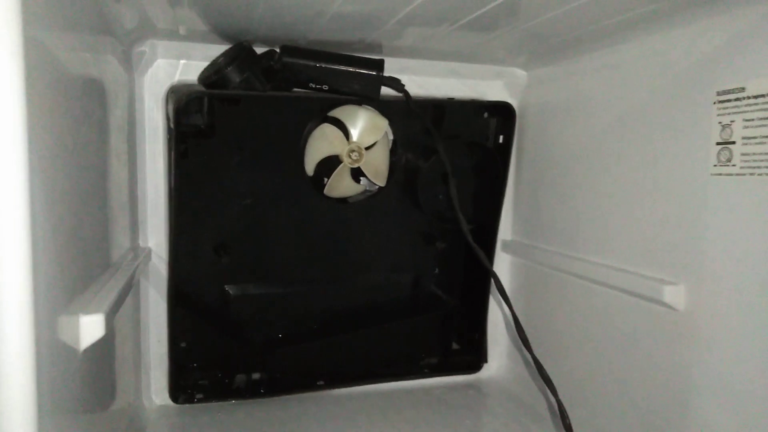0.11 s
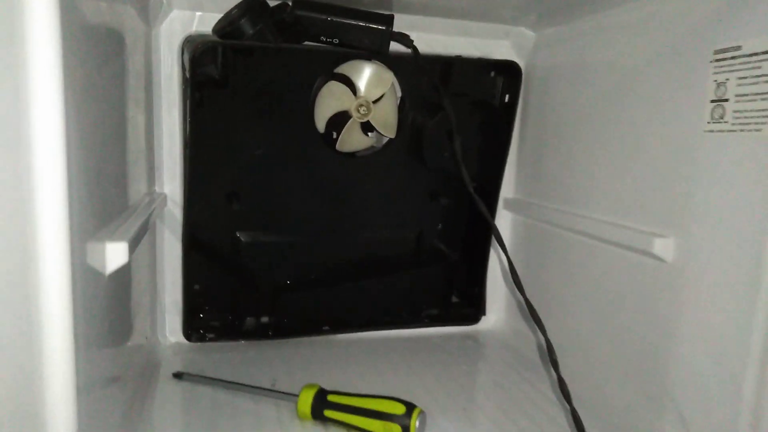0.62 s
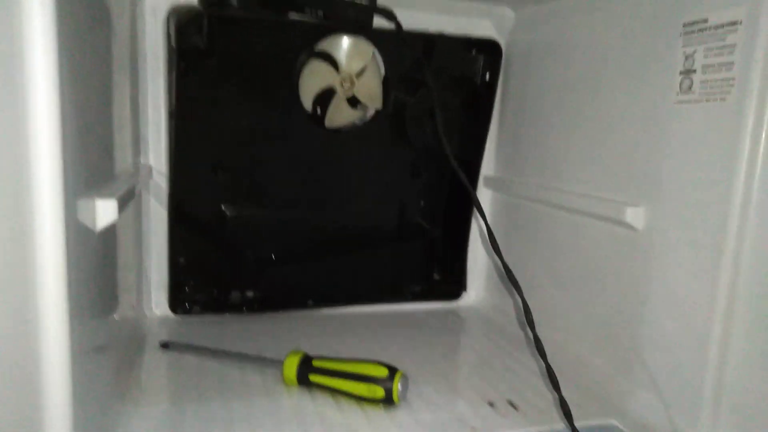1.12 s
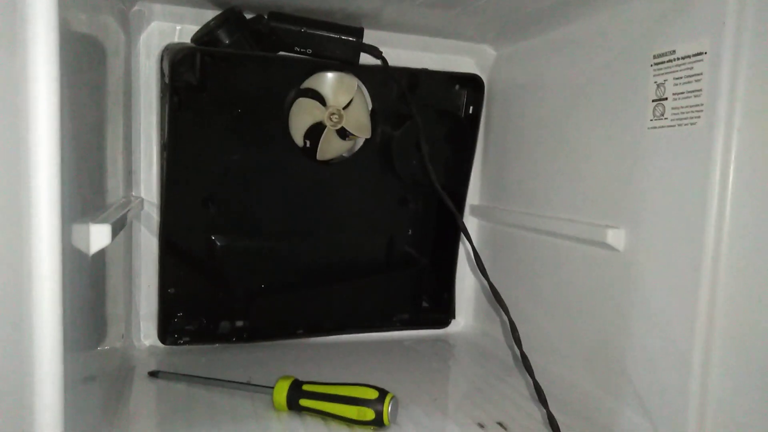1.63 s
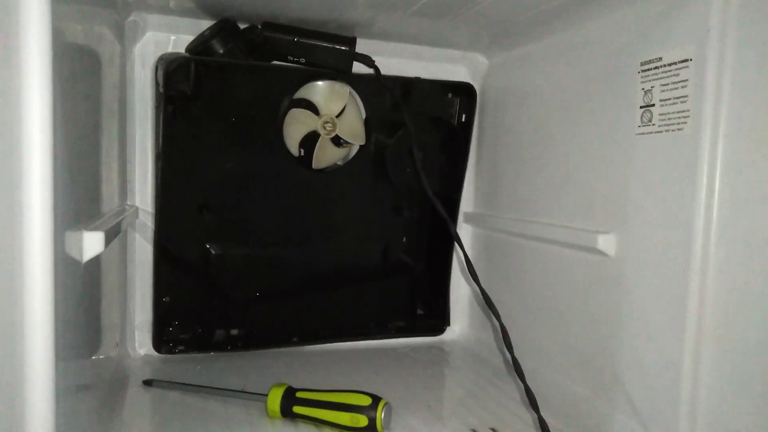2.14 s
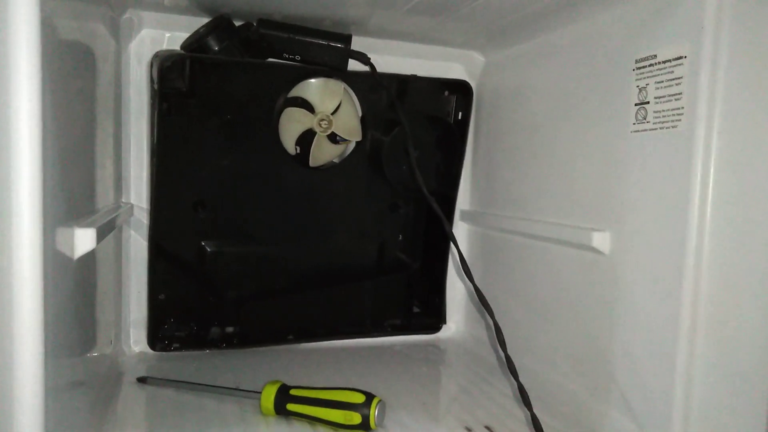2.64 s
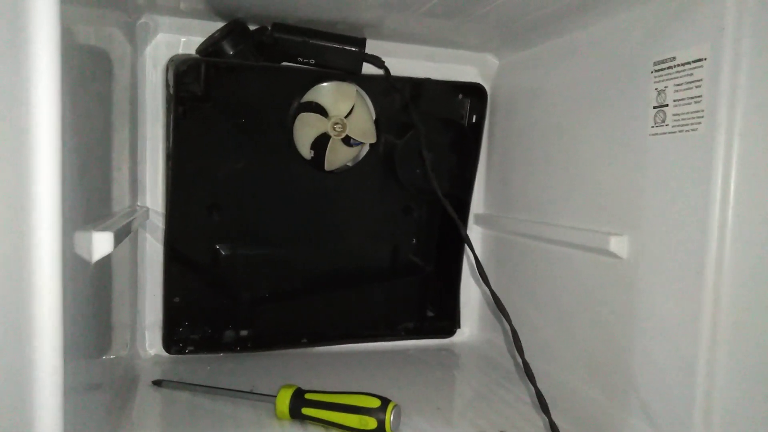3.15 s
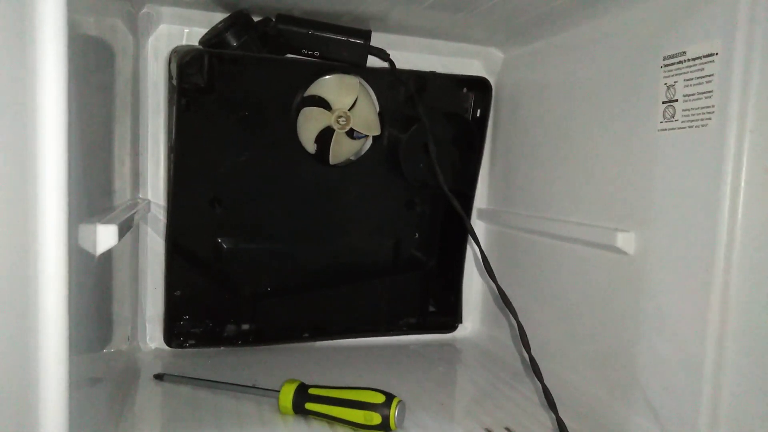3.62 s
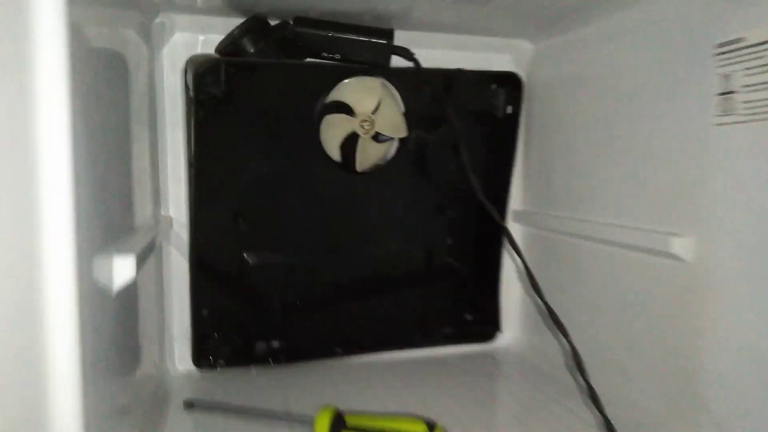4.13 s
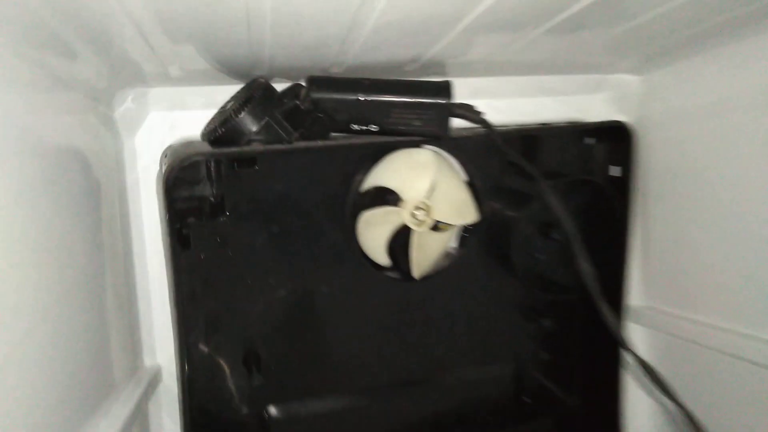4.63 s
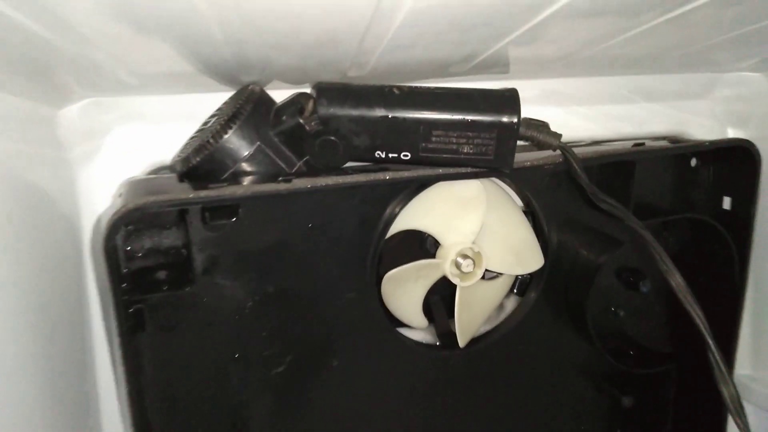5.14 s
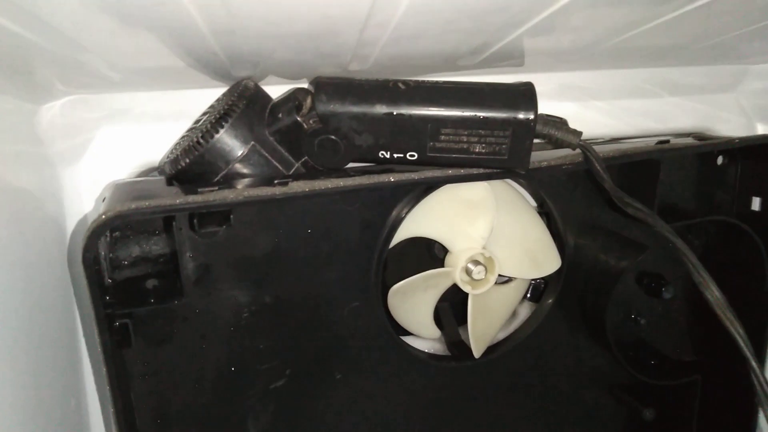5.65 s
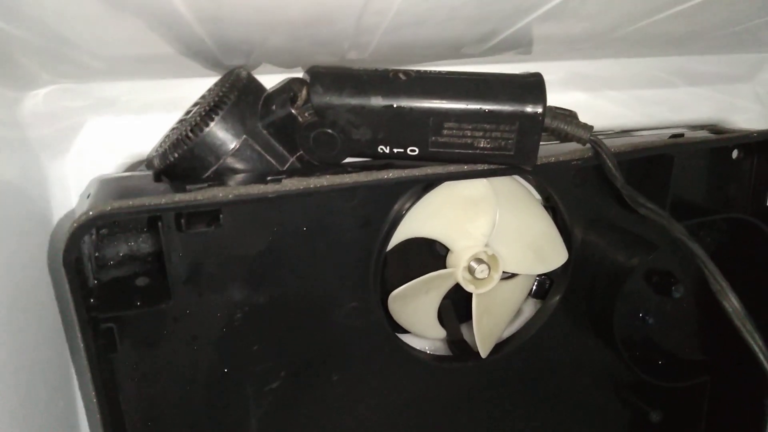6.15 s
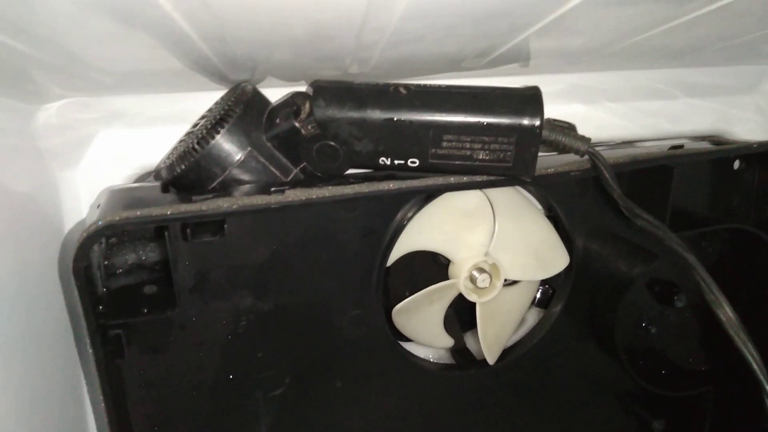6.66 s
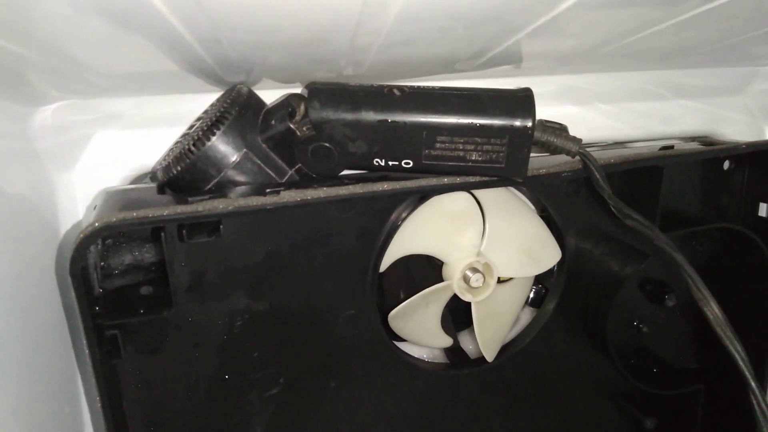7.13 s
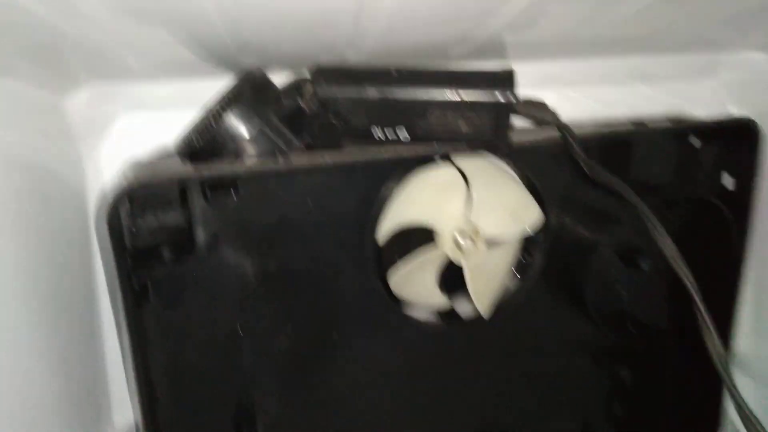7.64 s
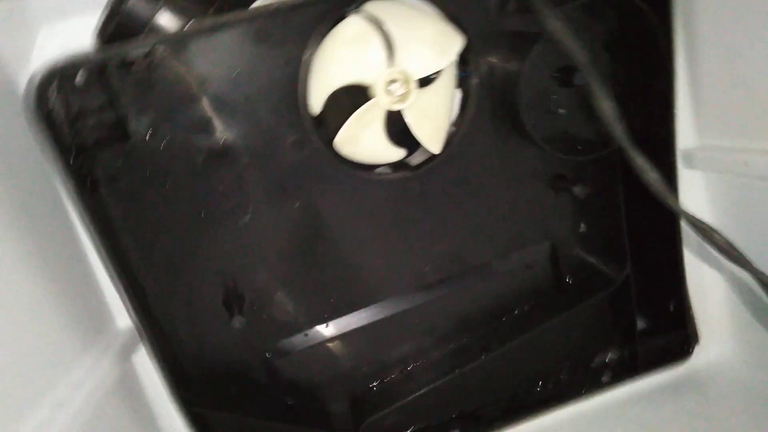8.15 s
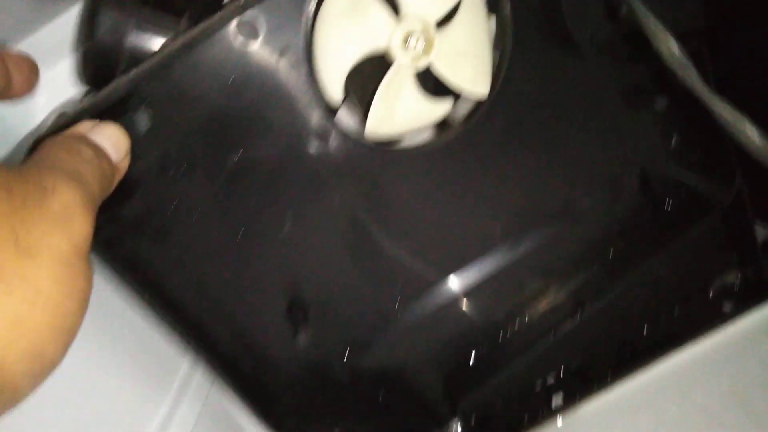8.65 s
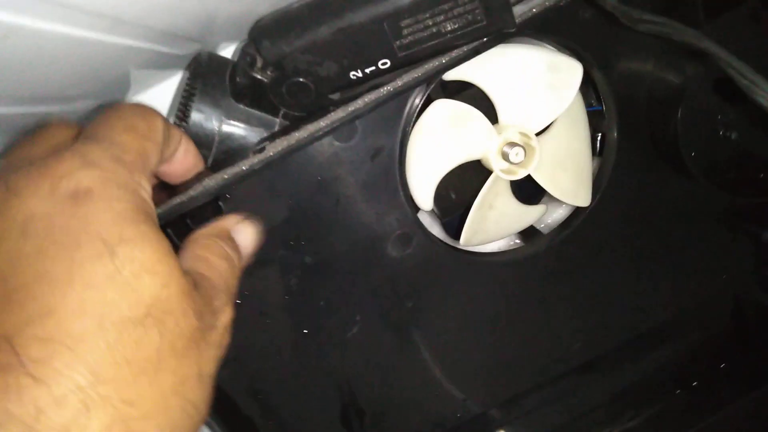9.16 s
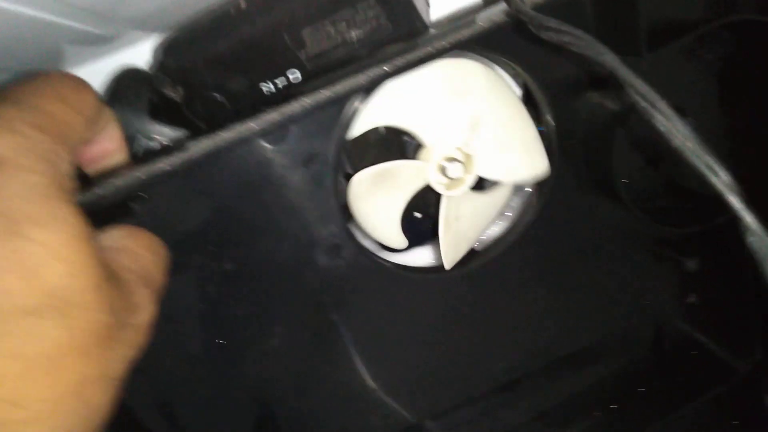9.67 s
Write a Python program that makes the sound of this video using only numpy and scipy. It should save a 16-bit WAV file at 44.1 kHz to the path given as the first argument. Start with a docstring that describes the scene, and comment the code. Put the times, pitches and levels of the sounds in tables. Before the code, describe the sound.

Continuous loud rush of blown air and whining small motor in a hollow plastic compartment, its tone shifting as the microphone moves closer and aside.

```python
"""A steady hiss, roar and whine: a hair dryer runs inside an empty plastic freezer box, heard by a moving microphone.
Roar and jet hiss are noise filtered by a response for each place; the whine is sines on the fan shaft's orders.
The hand-held mono microphone looks in from outside, moves in close, then swings aside out of the jet's treble.
Each place hears its own pattern of the box's standing waves; the input is loud enough to clip."""
import sys
import numpy as np
from scipy import signal
from scipy.fft import rfft, irfft
from scipy.io import wavfile
from scipy.ndimage import uniform_filter1d, map_coordinates

SR = 44100
rng = np.random.default_rng(int(sys.argv[2]) if len(sys.argv) > 2 else 0)


def dump_mix(stems):
    """Bounce the given channels to the path in sys.argv[1] as a 16-bit WAV at rate SR."""
    frames = np.atleast_2d(stems).T  # one column per channel
    limited = np.clip(frames, -1, 1)  # hard clip at full scale
    pcm = np.round(limited * 32767).astype(np.int16)
    wavfile.write(sys.argv[1], SR, pcm)


def invert_db(level):
    """Linear amplitude ratio for a level in decibels (20 dB per decade), elementwise."""
    return 10 ** (np.asarray(level, dtype=float) / 20)


N = 431298  # samples

# the hand's path: (t/s, place 0-6, between two numbers while moving)
HAND_PATH = [(0, 0), (.4, 0), (.8, .6), (1.6, 1), (4.05, 1), (4.45, 2), (4.68, 2), (4.85, 3), (7.74, 3),
             (7.85, 4), (8.2, 4), (8.5, 5), (8.75, 5), (9.05, 6), (9.78, 6)]


def unit(x):
    """Scaled to rms 1."""
    return x / np.sqrt(np.mean(x ** 2))


def along(points, hz):
    """(f/Hz, value) points read on a log frequency axis."""
    f, v = np.transpose(points)
    return np.interp(np.log(hz + 1), np.log(f + 1), v)


def curve(rows, s):
    """A table of (t/s, value) read at the times s."""
    return np.interp(s, *np.transpose(rows))


def at_place(values, s):
    """Values given for each place (last axis), blended along the hand's path."""
    place = curve(HAND_PATH, s)
    places = np.arange(values.shape[-1])[:, None]
    share = np.clip(1 - np.abs(place - places), 0, 1)
    return values @ share


def wobble(rate):
    """A smooth random curve, rate knots a second."""
    knots = rng.standard_normal(N // 100)
    return map_coordinates(knots, [np.arange(N) * rate / SR])


def smooth_noise(shape, bins, frames):
    """Random gains at rms 1, smoothed over frequency bins and time frames."""
    rough = rng.standard_normal(shape)
    across = uniform_filter1d(rough, size=bins, axis=0)
    return unit(uniform_filter1d(across, size=frames, axis=1))


def air(patchy_db=0.5, comb_db=1.57, split_hz=3000, drift_db=0.1):
    """Turbulent noise of fan and jet, coloured by the box at each place, with faint eddies of gain."""
    # fan roar through the box's standing waves, one table a place: (f/Hz, level/dB per Hz)
    roar_places = [
        [(43, -70), (269, -59.5), (495, -63.5), (645, -70), (775, -62.5), (1012, -51), (1270, -50.5),
         (1539, -51), (1733, -56), (1841, -49), (1959, -55), (2293, -46.5), (2508, -45.5), (2993, -55.5)],
        [(43, -66.5), (279, -59.5), (570, -62), (732, -68), (860, -65), (1035, -48.5), (1130, -58.5),
         (1259, -46), (1496, -53.5), (1625, -46.5), (1735, -51.5), (1830, -48), (1948, -54.5), (2465, -48.5),
         (2993, -53.5)],
        [(43, -65.2), (161, -58), (290, -58), (495, -67), (699, -65), (904, -48), (1119, -55), (1335, -45),
         (1485, -52), (1604, -48), (1744, -51), (2444, -44), (2767, -57), (2993, -49)],
        [(43, -71), (139, -57.5), (279, -59), (419, -71), (559, -57), (710, -63), (1238, -49), (1561, -57.5),
         (1711, -50.5), (1905, -53), (2121, -42), (2260, -46), (2637, -46), (2993, -54.5)],
        [(43, -62.1), (172, -56), (419, -64.5), (710, -62), (893, -52), (1087, -61), (1324, -42.5), (1507, -58),
         (1690, -53.6), (2239, -46.5), (2390, -51), (2648, -44.5), (2885, -53), (2993, -50)],
        [(43, -61.6), (161, -55.5), (430, -64.5), (624, -57), (742, -67), (947, -49), (1130, -57.5),
         (1302, -50), (1561, -61), (1744, -51.5), (1927, -46), (2293, -43.5), (2487, -48), (2993, -53)],
        [(43, -63.1), (247, -55.5), (430, -68), (581, -60.5), (721, -66), (904, -53.5), (1141, -58.5),
         (1302, -53.5), (1475, -58), (2013, -45), (2293, -51.5), (2497, -45), (2767, -50.3), (2993, -50.5)],
    ]
    # jet hiss from the nozzle, one table a place: (f/Hz, level/dB per Hz)
    hiss_places = [
        [(3100, -52), (3466, -56), (4037, -50.5), (4758, -61.5), (5437, -52.5), (7310, -50), (7924, -46.3),
         (9097, -46.5), (9851, -50), (11487, -61), (14761, -60.8), (15590, -64)],
        [(3100, -52.5), (3456, -57.5), (4026, -51), (4748, -61), (5200, -54), (6126, -54), (6621, -50.5),
         (7741, -47), (9194, -46), (12112, -63.5), (14287, -61.5), (15590, -66)],
        [(3100, -56), (3348, -56.5), (4005, -50.5), (4737, -57.6), (5900, -50), (7827, -46.5), (8322, -46.5),
         (9571, -47.5), (11638, -63), (13382, -62.8), (14319, -59.8), (15590, -57)],
        [(3100, -51), (3413, -53), (4091, -45.5), (4285, -49.5), (4608, -56.5), (4801, -56.5), (6632, -47.5),
         (7784, -45.5), (8624, -48), (9377, -46), (11552, -62.5), (15590, -60.1)],
        [(3100, -48.5), (3531, -52), (4080, -45), (4823, -53.5), (5490, -50.5), (6072, -53.4), (7622, -51.5),
         (8860, -54.5), (10841, -56.5), (12532, -66), (13016, -69), (15590, -61)],
        [(3100, -50.5), (4080, -46.5), (4715, -55.5), (5221, -50), (6836, -51), (7601, -48.5), (9194, -56),
         (9948, -55.5), (11315, -61.5), (12489, -68), (13232, -69), (15590, -63)],
        [(3100, -50.5), (4145, -45.5), (4823, -54.5), (5480, -49), (6589, -51.5), (8021, -48), (9194, -55.5),
         (9905, -55), (10562, -58), (12887, -71), (14351, -71), (15590, -65.3)],
    ]
    # lowest air mode of the box and the thin bass under it: (f/Hz, gain/dB)
    boom = [(25, -7), (60, -5), (105, -13), (118, -3), (129, 13), (142, -1.5), (165, -0.5), (210, -3),
            (300, 0)]
    # the roar dips and swells as the microphone changes place: (t/s, gain/dB)
    roar_level = [(0, 0), (.5, 0), (4, -0.5), (4.5, -1.5), (5, -0.5), (7.5, -0.5), (7.8, -2), (8, 3),
                  (8.5, 0.5), (9, 1), (9.78, 1)]

    hz, s, z = signal.stft(rng.standard_normal(N), SR, nperseg=2048, noverlap=1536)
    colour_db = np.transpose([along(list(roar) + list(hiss), hz)
                              for roar, hiss in zip(roar_places, hiss_places)])
    jet = 1 / (1 + (split_hz / (hz[:, None] + 1)) ** 4)  # the hiss takes over from the roar
    drift = np.interp(s, np.arange(N) / SR, wobble(1.55))
    level_db = (1 - jet) * curve(roar_level, s) + drift_db * drift
    eddies = smooth_noise(z.shape, bins=15, frames=8)
    # the box's dense upper modes: a fine random comb that drifts slowly
    modes = smooth_noise(z.shape, bins=3, frames=60)
    db = at_place(colour_db, s) + along(boom, hz)[:, None] + level_db
    db += comb_db * modes + patchy_db * eddies
    noise = signal.istft(z * invert_db(db), SR, nperseg=2048, noverlap=1536)[1][:N]
    return np.sqrt(SR / 2) * noise  # white noise of power 1 per Hz, so the tables read in dB per Hz


def motor(flutter_db=0.47, smear=0.0085, ripple_hz=120.2, swell_order=21):
    """Shaft orders and rectified-mains ripple sidebands; turbulence shakes each, the high orders most."""
    # speed of the fan shaft: (t/s, rate/turns per s)
    shaft_speed = [(0, 259.57), (.55, 259.76), (1, 259.29), (2.4, 259.67), (3.3, 259.38), (3.9, 259.9),
                   (4.6, 259.38), (5.4, 259.52), (5.65, 259.1), (6.15, 259.67), (6.7, 259.3), (8, 259.62),
                   (8.95, 259.14), (9.3, 259.95), (9.78, 260.52)]
    # seven blades, and the ripple beating with the shaft: (times shaft rate, plus times ripple rate)
    orders_heard = [(0, 1), (1, -1), (0, 2), (1, 0), (2, -2), (1, 1), (1, 2), (2, 0), (1, 3), (7, 0),
                    (8, 0), (10, 0), (11, 0), (14, 0), (21, 0), (28, 0)]
    # rms of each tone: (outside/dB, close in/dB, swung aside/dB, last place/dB)
    tones = [(-41, -34, -37, -32.5), (-38.5, -35.5, -33, -34.5), (-48.5, -52, -44, -52),
             (-37, -35, -30, -36.5), (-46, -48, -35, -42.5), (-54, -48, -49, -51), (-44, -45, -48, -63),
             (-49, -44, -44, -55), (-48, -48, -45, -54), (-24, -26.5, -28, -22.5), (-31, -35, -26, -29),
             (-39, -28, -37, -29), (-35, -43, -37, -39), (-35.5, -31, -28, -34), (-29.5, -25.5, -26, -25),
             (-42, -39, -40, -35)]
    # places on the hand's path where these four levels hold
    tone_places = [2, 3, 4.5, 6]
    # a blade tone fades to nothing and back: (t/s, width to each side/s, shaft order)
    fades = [(.1, .9, 7), (.56, .08, 14), (1.2, .1, 21), (2.6, .08, 14), (4.16, .08, 21), (4.5, .07, 21),
             (4.7, .12, 7), (4.8, .06, 21), (6.5, .3, 14), (7.88, .08, 21), (7.9, .13, 7), (8.08, .12, 14),
             (8.75, .05, 21), (8.92, .04, 21), (9.53, .12, 7), (9.7, .2, 14), (9.78, .25, 7)]
    # the third blade harmonic swells around the later moves: (t/s, width to each side/s, gain/dB)
    swells = [(7.7, .12, 5), (8.6, .1, 5), (9.3, .15, 4)]

    s = np.arange(N) / SR
    shaft = np.cumsum(curve(shaft_speed, s)) / SR  # turns so far
    place = curve(HAND_PATH, s)
    swell_db = sum(db * np.exp(-((s - at) / width) ** 2) for at, width, db in swells)
    out = np.zeros(N)
    for (turns, ripples), levels_db in zip(orders_heard, tones):
        cycles = turns * shaft + ripples * ripple_hz * s + rng.random()
        cycles += smear * np.sqrt(turns) * wobble(25)
        shake_db = flutter_db * (1 + turns) ** 0.16 * (0.27 * wobble(1.8) + wobble(9))
        dips = [np.tanh(np.abs(s - at) / width) for at, width, order in fades if order == turns]
        level_db = np.interp(place, tone_places, levels_db) + shake_db
        if turns == swell_order:
            level_db = level_db + swell_db
        sine = np.sqrt(2) * np.sin(2 * np.pi * cycles)  # rms 1
        out += np.prod(dips, axis=0) * invert_db(level_db) * sine
    return out


def input_stage(x, gain_db=0.48, top=0.78, hardness=7):
    """The overdriven input bends the peaks over smoothly towards a ceiling, top."""
    x = x * invert_db(gain_db)
    return x / (1 + np.abs(x / top) ** hardness) ** (1 / hardness)


def flicker(x, count=62, share=0.9):
    """Now and then a treble band differs between left and right: its phase-scrambled copy joins the side."""
    hz, s, z = signal.stft(x[0], SR, nperseg=1024)
    when, where = rng.random((count, 2)).T
    moment = np.abs(s - when[:, None] * N / SR) < .017  # s to each side
    centre_hz = 4800 + 10200 * where[:, None]
    band = np.abs(hz - centre_hz) < 400 + centre_hz / 30
    patches = band.T.astype(float) @ moment > 0
    scrambled = np.abs(z) * np.exp(2j * np.pi * rng.random(z.shape))
    side = share * signal.istft(patches * scrambled, SR, nperseg=1024)[1][:N]
    return x + [side, -side]


def band_limit(x, top_hz=15740):
    """Nothing passes above top_hz: those spectral bins are set to zero."""
    return irfft(rfft(x) * (np.fft.rfftfreq(N, 1 / SR) < top_hz), N)


def scene():
    """One microphone hears air and motor, copied to both channels."""
    return np.tile(air() + motor(), (2, 1))


def low_pass(x):
    """Removes everything above the highest recorded frequency."""
    return signal.sosfilt(signal.butter(12, 15820, fs=SR, output="sos"), x)


def record(dry):
    """The input clips the peaks, treble bands flicker between the sides, and the top is cut off."""
    clipped = input_stage(dry)
    mix = band_limit(flicker(clipped))
    return low_pass(mix)


dry = scene()
out = record(dry)
dump_mix(out)
```